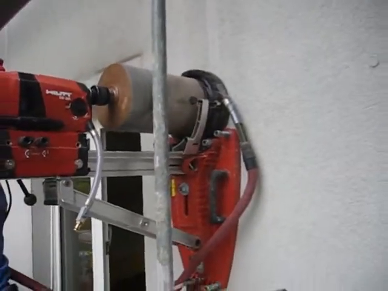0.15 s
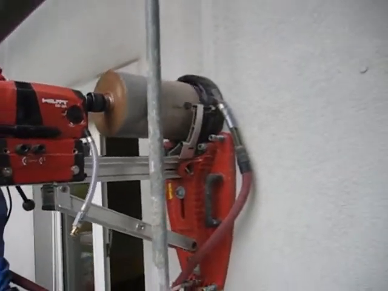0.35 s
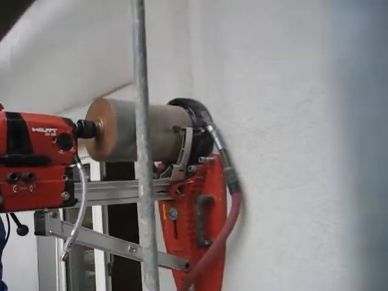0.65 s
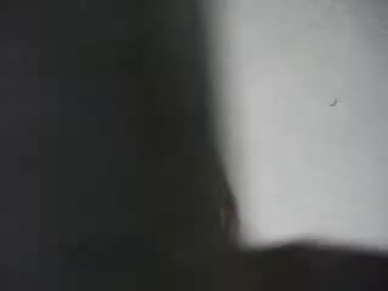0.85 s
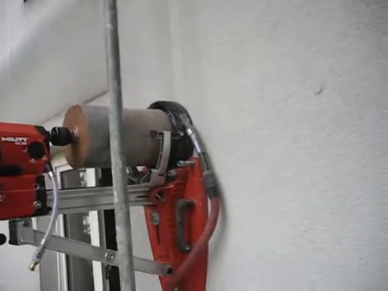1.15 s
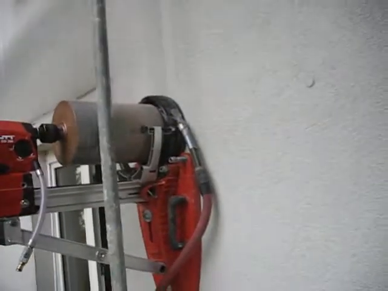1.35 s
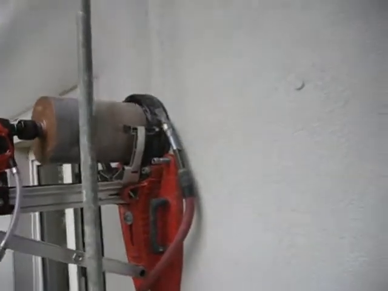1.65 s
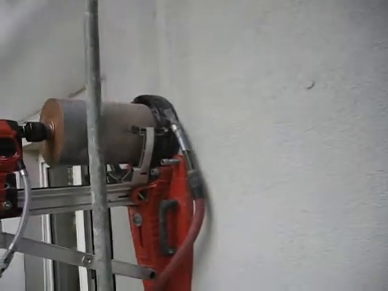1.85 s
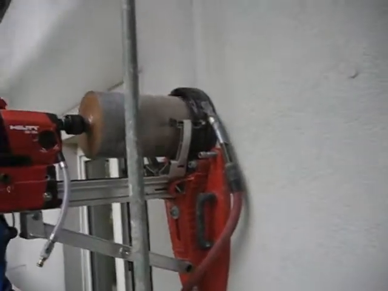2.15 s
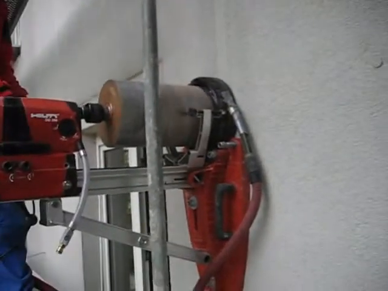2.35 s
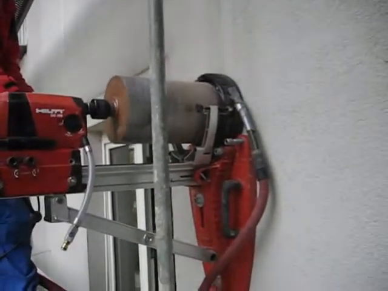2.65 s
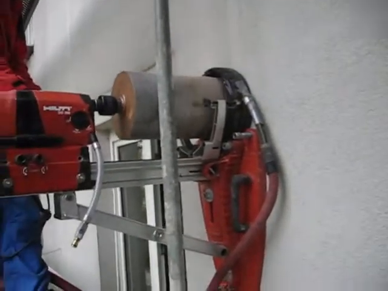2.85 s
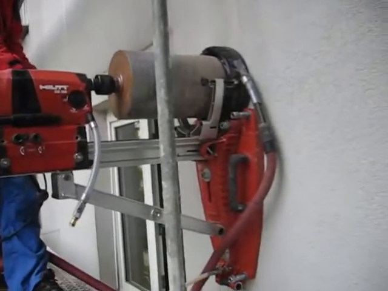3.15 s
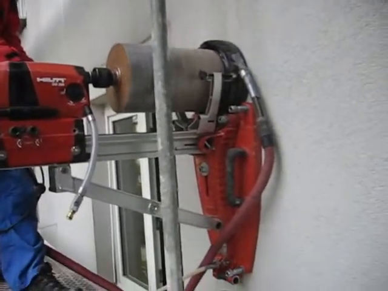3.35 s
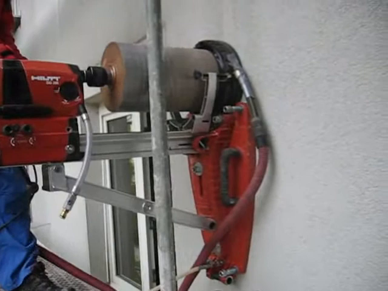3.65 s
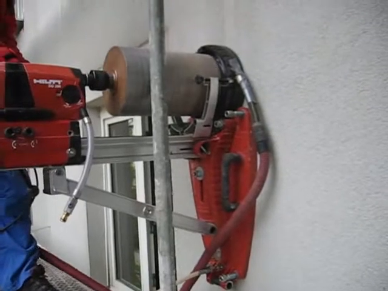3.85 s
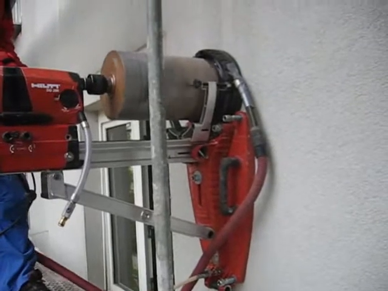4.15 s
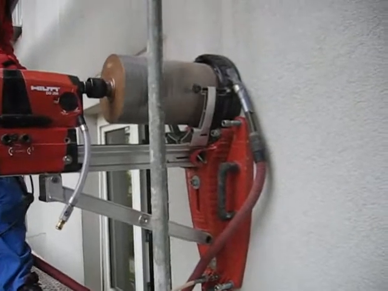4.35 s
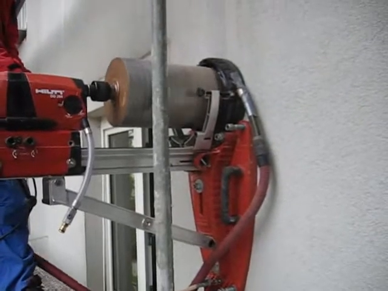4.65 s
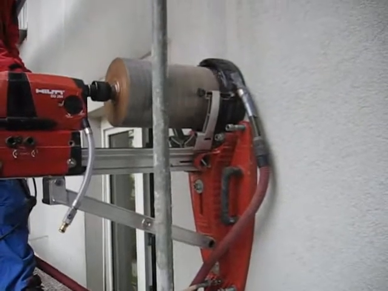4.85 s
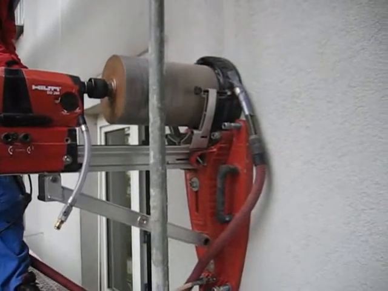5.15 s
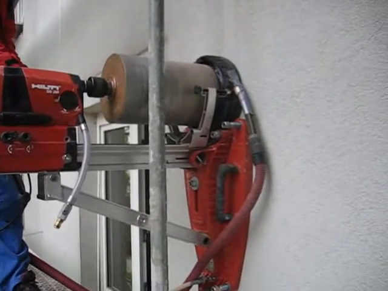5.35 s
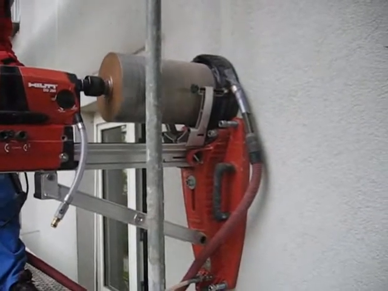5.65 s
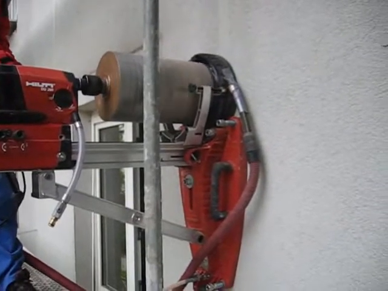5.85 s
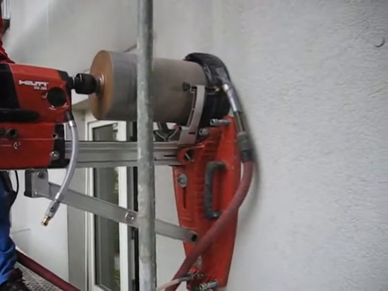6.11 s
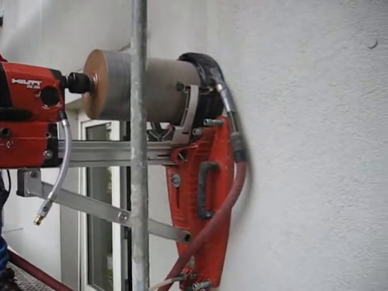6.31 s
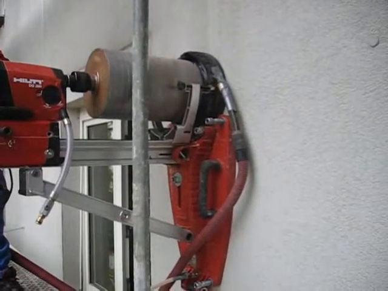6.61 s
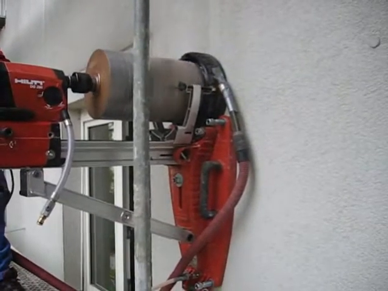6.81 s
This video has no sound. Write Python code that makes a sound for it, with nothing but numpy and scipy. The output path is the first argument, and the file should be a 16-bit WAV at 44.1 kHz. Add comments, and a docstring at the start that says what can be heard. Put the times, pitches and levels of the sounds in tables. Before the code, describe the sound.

Harsh constant drilling hiss with high steel ringing; something briefly sweeps past early on, and a few soft low knocks come later.

```python
"""Diamond core drill in a masonry wall

Grit makes the steel barrel's modes ring, over a broad cutting hiss. The gearbox hums faintly, a dull
rumble comes through the structure and three dull thumps come through the scaffold. Early on something
passes close in front: a bent path adds a late copy of the cutting sound, which weakens a rising band.
A small mono recorder overloads, samples slowly and holds each sample, which mirrors the treble."""
import sys
import numpy as np
from scipy import signal
from scipy.fft import rfft, irfft, next_fast_len
from scipy.io import wavfile

SR = 44100
rng = np.random.default_rng(int(sys.argv[2]) if len(sys.argv) > 2 else 0)


def wav_out(sig):
    """Save sig, one row per channel (or a flat mono array), as 16-bit PCM at SR to the path in sys.argv[1]."""
    wavfile.write(sys.argv[1], SR, np.round(np.clip(np.atleast_2d(sig).T, -1, 1) * 32767).astype(np.int16))


N = 307693

# All levels are those ahead of the recorder.
# Ringing modes of the steel barrel: pitch_hz, width_hz, level_db (relative within its group)
BARREL_MODES = [(1606, 43, -15.5), (1695, 63, -13), (1805, 58, -19), (2065.5, 35, -3.5), (2291, 25.6, -4.5),
                (2313, 48, -14), (2493, 17, -5), (2562, 50, 1.5), (2690, 43, -35), (2902, 32, -12.5),
                (2937, 27, -14), (3059, 75, -4.5), (3203, 52, -19.5), (3350, 35, -9), (3405, 41, -16.5),
                (3538, 47, -7), (3560, 14, -20), (3680, 43, -14.5), (3725, 78, -13.5), (3873, 44, -6.5),
                (3963, 86, -12), (4020, 38, -14), (4190, 45, -12.5), (4364, 49, -11.5), (4414, 41, -5.5),
                (4526, 130, -13.5), (4650, 28, -13), (4893, 113, -17), (5010, 48, -11.5), (5140, 76, -11.5)]
# Borders between the low, middle and high barrel modes: pitch_hz
GROUP_BORDERS_HZ = 2400, 2800
# Colour of the cutting hiss: pitch_hz, level_db (relative, per Hz)
HISS_COLOUR = [(1200, -35), (1550, -13.5), (1900, -3.5), (2400, 1.5), (2800, -7.5), (3500, -0.5),
               (4300, -3), (5300, -0.5), (5800, -4), (7000, -36)]
# Colour of the rumble of motor and stand: pitch_hz, level_db (relative, per Hz)
RUMBLE_COLOUR = [(15, -20), (35, -25), (120, -11.5), (370, -8), (680, -9.5), (900, -6), (1200, -7.5),
                 (1450, -9), (1600, -10.5), (3000, -58)]
# Broad resonances of the stand: pitch_hz, width_hz, level_db (rms at the start)
STAND_RESONANCES = [(887, 16, -38.5), (924.6, 38, -33.5), (443, 63, -51), (1080, 110, -43)]
# Gear tones: pitch_hz (average), level_db (rms, before it wanders)
GEAR_TONES = [(333, -51), (425, -45.5), (709, -45.5), (1437, -42.5), (1475, -54)]
# Blows on the scaffold: start_s, level_db (strength of the first contact, before softening)
THUMP_BLOWS = [(3.381, -20.5), (3.973, -20), (4.565, -20)]
# Contacts within each blow: delay_s (after the first), level_db (relative)
CONTACTS = [(0, 0), (0.015, -7), (.034, -2), (.081, -4.5)]
# Low modes that a blow sets ringing: pitch_hz, level_db (relative), decay_s (time to fall 60 dB)
THUMPED_MODES = [(55, 0, 0.12), (109, -1.5, .09), (142, -3, 0.16), (312, -4.5, 0.15)]

# Balance of each layer: level_db (steady rms), early_change_db (before the listener moves into the open)
HISS_BALANCE = (-18.5, 0.1)
RUMBLE_BALANCE = (-28, -1.6)
GROUND_BALANCE = (-41, -3.5)
# The same for the barrel, one row each for low, middle and high modes: level_db, early_change_db
BARREL_BALANCE = [(-23, -1.5), (-18.5, -8.5), (-16.5, -1.3)]
# The early balance gives way to the steady one between these two moments: time_s
OPENING_TIMES_S = 1, 1.19

# As the bit sinks in, the stand rings less and the low barrel modes ring more
STAND_FADE_DB_PER_S, LOW_MODES_RISE_DB_PER_S = 0.5, 0.35

# An obstacle starts to cover the drill, covers it, starts to clear and is gone
COVER_S, COVERED_S, CLEARING_S, CLEAR_S = 0.528, 0.65, 0.86, 0.974
BENT_SHARE = 0.43       # strength of the bent path beside the direct one
COVERED_GAIN_DB = 1.5   # gain while covered, on top of the mix of the two paths
NOTCH_FROM_HZ, NOTCH_TO_HZ, NOTCH_TOP_S = 2300, 5450, 0.86   # the weakened band climbs until this moment

SAMPLE_RATE_HZ, CLOCK_PHASE_STEPS = 11026, 0.2   # the recorder's slow clock
CUTOFF_HZ = 15760


def from_db(db):
    """Turn decibels into gain."""
    return 10 ** (np.asarray(db) / 20)


def rms_one(x):
    """Scale a sound to an rms (average strength) of 1."""
    return x / np.sqrt(np.mean(x ** 2) + 1e-20)


def ramp(times_s, values):
    """Draw straight lines between moments, one value per sample."""
    return np.interp(np.arange(N) / SR, times_s, values)


def level_db(balance):
    """Move a layer from its early level to its steady one."""
    steady_db, early_change_db = balance
    return steady_db + ramp(OPENING_TIMES_S, [early_change_db, 0])


def drift(rate_hz):
    """Wander slowly around 0 with a spread of 1: noise smoothed twice by a one-pole low-pass."""
    step = 40   # one coarse point per 40 samples
    r = np.exp(-2 * np.pi * rate_hz * step / SR)
    noise = rng.standard_normal(N // step + 2002)
    slow = signal.lfilter([1], [1, -2 * r, r * r], noise)[2000:]   # drop the filter's start-up
    return np.interp(np.arange(N) / step, np.arange(len(slow)), rms_one(slow))


def coloured(colour):
    """Shape noise to the given level per Hz, with an rms of 1."""
    hz, db = np.transpose(colour)
    size = next_fast_len(N)
    bins_hz = np.maximum(np.fft.rfftfreq(size, 1 / SR), 1)
    gain = from_db(np.interp(np.log(bins_hz), np.log(hz), db, left=-90, right=-90))
    spectrum = rfft(rng.standard_normal(size)) * gain
    return rms_one(irfft(spectrum, size)[:N])


def resonance(x, hz, width_hz):
    """Let through a narrow band, as a ringing body does, with gain 1 at its top (two poles)."""
    r = np.exp(-np.pi * width_hz / SR)
    top = (1 - r * r) / 2
    return signal.lfilter([top, 0, -top], [1, -2 * r * np.cos(2 * np.pi * hz / SR), r * r], x)


def ground():
    """Make the dull rumble that comes through the structure from low-pitched noise."""
    keep_low = signal.butter(2, [40.0, 250.0], "band", fs=SR, output="sos")
    low = signal.sosfilt(keep_low, rng.standard_normal(N))
    return from_db(level_db(GROUND_BALANCE)) * rms_one(low)


def motor():
    """Add broad rumble, the stand's resonances and gear tones whose pitch wavers with the load."""
    out = from_db(level_db(RUMBLE_BALANCE)) * coloured(RUMBLE_COLOUR)
    fade_db = STAND_FADE_DB_PER_S * np.arange(N) / SR
    for hz, width_hz, db in STAND_RESONANCES:
        ringing = rms_one(resonance(rng.standard_normal(N), hz, width_hz))
        out += from_db(db - fade_db) * ringing
    wavering_time_s = np.cumsum(1 + 0.004015 * drift(0.788)) / SR   # shared by all gear tones
    for hz, db in GEAR_TONES:
        tone = np.sqrt(2) * np.sin(2 * np.pi * hz * wavering_time_s)   # rms 1
        out += from_db(db + 1.6 * drift(3.6)) * tone
    return out


def thumps():
    """Let each soft blow bounce three times and set the same low modes ringing."""
    blows = np.full(N, 1e-18)
    for start_s, db in THUMP_BLOWS:
        for delay_s, contact_db in CONTACTS:
            blows[round((start_s + delay_s) * SR)] = -from_db(db + contact_db)
    soften = signal.butter(2, [35.0, 380.0], "band", fs=SR, output="sos")
    soft_blows = signal.sosfilt(soften, blows)
    out = np.zeros(N)
    for k, (hz, db, decay_s) in enumerate(THUMPED_MODES):
        r = from_db(-60 / (decay_s * SR))   # what is left of the ringing after one sample
        w = 2 * np.pi * hz / SR
        sign = (-1) ** k   # neighbouring modes start in opposite directions
        strike = [0, from_db(db) * np.sin(w)]
        out += sign * signal.lfilter(strike, [1, -2 * r * np.cos(w), r * r], soft_blows)
    return out


def cutting_hiss():
    """Make the broad hiss of cutting from coloured noise whose level flutters."""
    return from_db(level_db(HISS_BALANCE) + 1.3 * drift(21.0)) * coloured(HISS_COLOUR)


def barrel():
    """Let grit noise ring each mode; the grip on every mode wanders as the bit turns."""
    groups = np.zeros((3, N))
    grit = rng.standard_normal((2, N))   # two noises, taken in turn by the modes
    for k, (hz, width_hz, db) in enumerate(BARREL_MODES):
        once = resonance(grit[k % 2], hz, 1.43 * width_hz)
        mode = resonance(once, hz, 1.43 * width_hz)   # the second pass makes steep sides
        group = np.searchsorted(GROUP_BORDERS_HZ, hz)
        groups[group] += from_db(db + 1.26 * drift(2.15)) * mode
    low_db, middle_db, high_db = [level_db(balance) for balance in BARREL_BALANCE]
    low_db = low_db + LOW_MODES_RISE_DB_PER_S * np.arange(N) / SR
    low, middle, high = [rms_one(group) for group in groups]
    return from_db(low_db) * low + from_db(middle_db) * middle + from_db(high_db) * high


def shaded(x):
    """Add the bent path round the obstacle: half a cycle late, it partly cancels a climbing band."""
    cover = ramp([COVER_S, COVERED_S, CLEARING_S, CLEAR_S], [0, 1, 1, 0])
    notch_hz = ramp([COVER_S, NOTCH_TOP_S], [NOTCH_FROM_HZ, NOTCH_TO_HZ])
    delay_samples = SR / (2 * notch_hz)
    late = np.interp(np.arange(N) - delay_samples, np.arange(N), x)
    share = BENT_SHARE * cover
    return from_db(COVERED_GAIN_DB * cover) * (x + share * late) / (1 + share)


def scene():
    """Mix all layers into one microphone signal that feeds both channels."""
    cutting = shaded(cutting_hiss() + barrel())
    mono = ground() + motor() + thumps() + cutting
    return np.array([mono, mono])


def record(dry):
    """Overload the input softly, hold each slow sample (which mirrors the treble), then cut the top."""
    ceiling = 0.53
    loud = from_db(1.5) * dry / ceiling
    clipped = ceiling * loud / (1 + np.abs(loud) ** 5) ** (1 / 5)
    before_sampling = signal.cheby1(8, 0.5, 5600, fs=SR, output="sos")
    band = signal.sosfilt(before_sampling, clipped)
    # The slow clock slips against SR by one output sample four times a second
    tick = np.floor(np.arange(N) * SAMPLE_RATE_HZ / SR + CLOCK_PHASE_STEPS)
    taken_at = tick * SR / SAMPLE_RATE_HZ
    held = np.array([np.interp(taken_at, np.arange(N), side) for side in band])
    cut_top = signal.ellip(12, 0.3, 60, CUTOFF_HZ, fs=SR, output="sos")
    return signal.sosfilt(cut_top, held)


dry = scene()
out = record(dry)
wav_out(out)
```